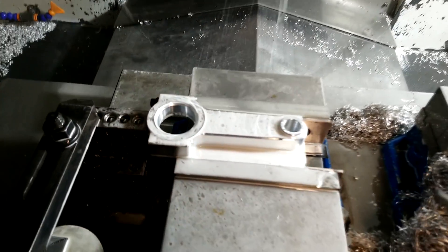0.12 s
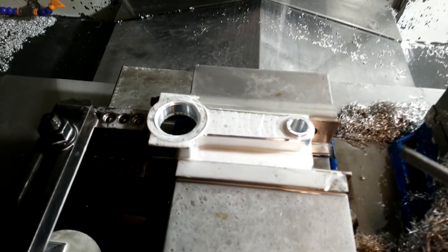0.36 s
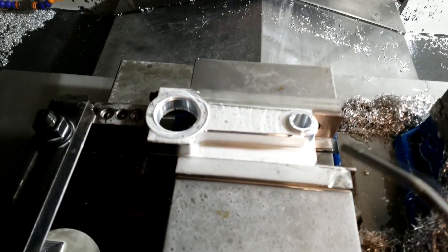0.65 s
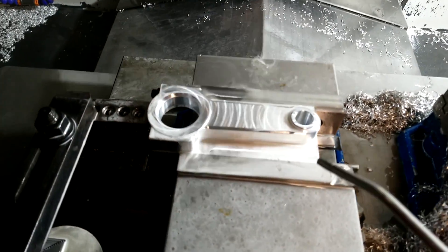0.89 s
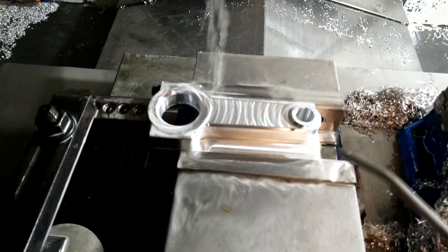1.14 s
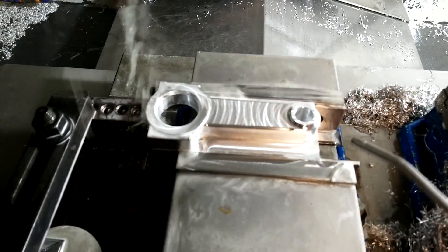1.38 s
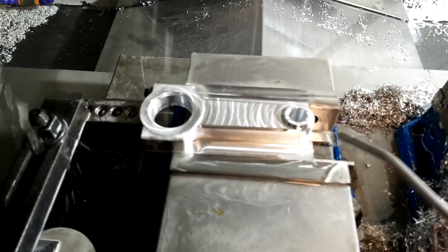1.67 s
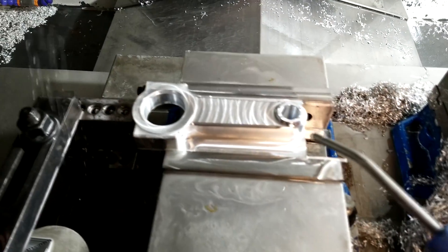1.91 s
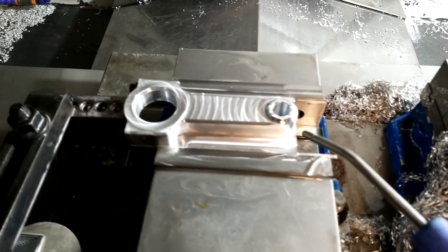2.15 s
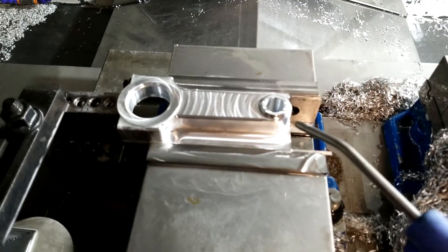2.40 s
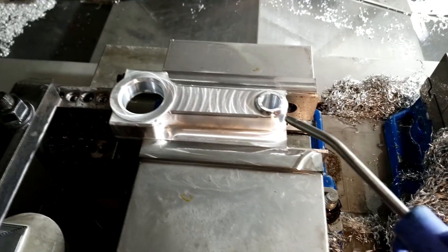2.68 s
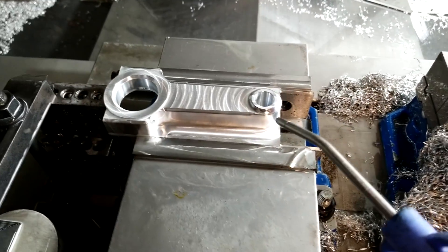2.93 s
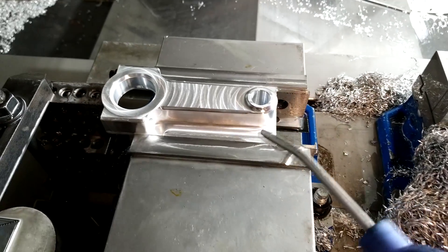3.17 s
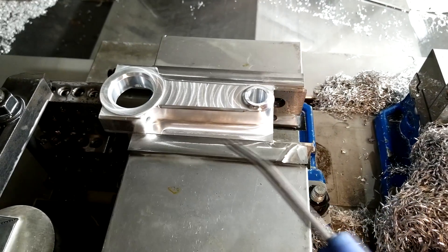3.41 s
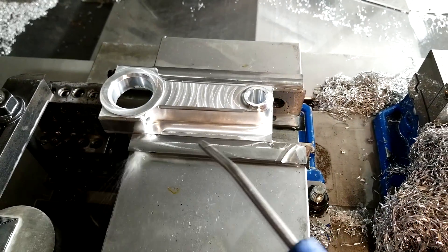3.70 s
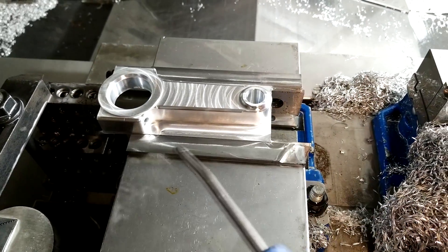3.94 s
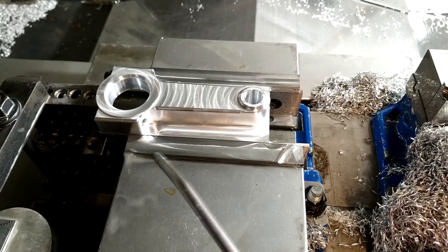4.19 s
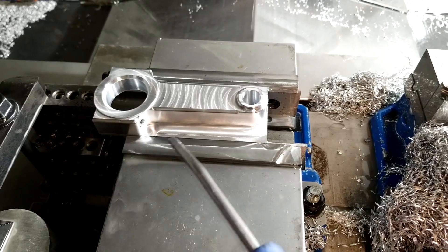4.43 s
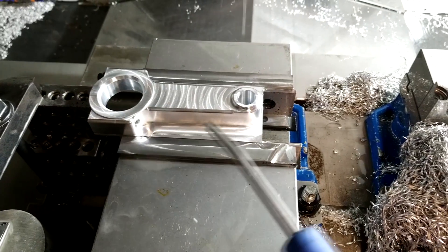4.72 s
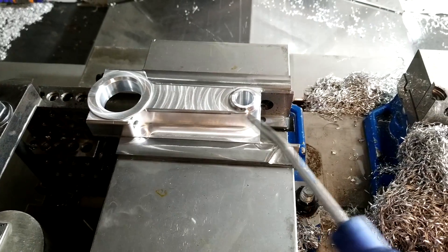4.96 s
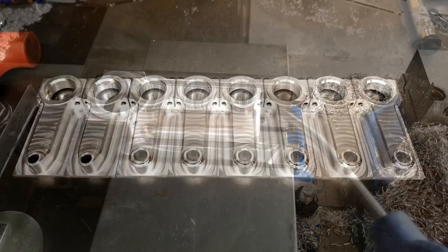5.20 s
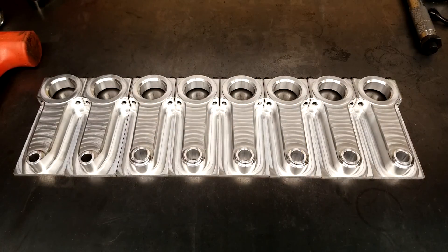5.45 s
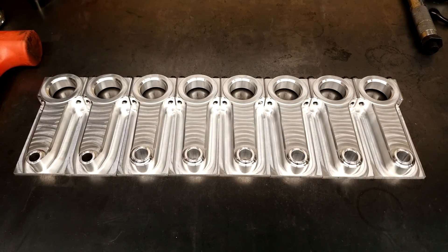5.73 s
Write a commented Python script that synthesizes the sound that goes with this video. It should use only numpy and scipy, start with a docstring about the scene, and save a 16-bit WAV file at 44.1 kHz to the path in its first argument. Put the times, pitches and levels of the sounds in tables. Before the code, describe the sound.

A sharp, continuous compressed air jet hisses inside a sheet-metal machine enclosure, left of a close stereo microphone. Two pairs of knocks rattle the walls in the first half second; then the jet hits the part more squarely and gains breathy, whistling resonances as it crosses holes and edges. Faint machine rumble and softer bumps continue underneath. Around five seconds it fades into a quiet humming workshop, with a tiny double tick near the end.

```python
"""An air nozzle sweeps over a milled metal part inside a machine enclosure, to the left of a stereo microphone.
From the start the jet hisses and scrubs the metal (shaped noise) and blows hollows into tone (resonant noise),
while low machine noise rumbles beneath. Now and then knocks ring the sheet-metal walls (decaying rattles through
resonances) and the frame thuds (bursts of deep noise). Near the end all this cross-fades into a workshop with
humming tones and room noise, where a small hard part ticks twice (short pulses through resonances)."""
import sys
import numpy as np
from scipy import signal
from scipy.fft import rfft, irfft, next_fast_len
from scipy.io import wavfile
from scipy.ndimage import uniform_filter1d, map_coordinates

SR = 44100
rng = np.random.default_rng(int(sys.argv[2]) if len(sys.argv) > 2 else 0)


def field_ratio(decibels):
    """Amplitude ratio for a level in dB (20 dB per decade); scalars and array-likes work."""
    return 10 ** (np.asarray(decibels, dtype=float) / 20)


def persist_wave(psi):
    """Save psi, clipped to +-1, as 16-bit WAV."""
    counts = np.round(np.clip(psi, -1, 1) * 32767).astype(np.int16)
    wavfile.write(sys.argv[1], SR, np.atleast_2d(counts).T)


N = 257532  # length of the scene [samples]

# Loudness of the air: (time [s], free jet [dB], jet fringe [dB], scrubbing [dB], left minus right [dB])
AIR_LEVELS = [(0.0, -39.5, -46.5, -46.5, 7), (0.26, -37, -44, -45, 8), (0.58, -36.5, -44.5, -44, 8.5),
              (1.0, -33.5, -42, -44.5, 9), (1.1, -34.5, -47.5, -46.5, 8.5), (1.27, -38, -46, -41.5, 8),
              (1.65, -37, -41.5, -43.5, 6.5), (1.91, -37, -44.5, -42, 8.5), (2.47, -35, -43, -42, 9),
              (2.91, -35.5, -44, -42, 9.5), (3.1, -37.5, -48.5, -45.5, 9.5), (3.22, -34, -47, -45.5, 10.5),
              (3.48, -37, -42.5, -48.5, 8.5), (3.77, -38.5, -42, -47.5, 8.5),
              (3.95, -35.5, -44, -44.5, 8.5), (4.27, -37.5, -45, -47.5, 7.5),
              (4.49, -35.5, -43.5, -46.5, 8.5), (4.63, -36.5, -42, -48, 9.5), (4.77, -34, -47.5, -47, 9.5),
              (4.9, -37, -50, -46.5, 11.5), (5.0, -37, -46, -42.5, 8.5), (5.2, -36, -44, -43, 7.5),
              (5.33, -35.5, -43, -44, 6.5), (5.5, -38, -50, -47, 6)]
# Noise colour of the free jet: (frequency [Hz], relative level per Hz [dB])
JET_COLOUR = [(6940, -31), (11800, -6.5), (12800, 2.5), (15100, 3.5), (16000, -4)]
# Noise colour of the jet's fringe: (frequency [Hz], relative level per Hz [dB])
FRINGE_COLOUR = [(5180, -34), (8800, -8.5), (11000, -4.5), (12400, -3), (16100, -43), (22000, -120)]
# Noise colour of air scrubbing metal: (frequency [Hz], relative level per Hz [dB])
SCRUB_COLOUR = [(3180, -32), (5400, -4.5), (5770, 0), (7390, 0), (8020, 2.5), (9000, -5), (11700, -24),
                (19800, -120)]
# Brief dips of the whole air sound: (time [s], depth [dB])
AIR_DIPS = [(0.39, 3), (1.062, 3.5), (2.745, 2.5), (3.105, 2)]
DIP_S = 0.0096  # half width of a dip [s]
# Resonances of each hollow, before their peaks are steepened: (frequency [Hz], width [Hz], level [dB])
HOLLOW_MODES = [
    [(750, 144, -3.5), (1020, 290, 3)],
    [(1510, 660, 2)],
    [(1915, 490, -1), (2516, 630, 2)],
    [(3614, 610, -3), (4060, 720, -6)],
    [(4330, 280, -0.5), (4860, 420, -1.5), (5360, 1360, -1)],
]
# modes before steepening: (frequency [Hz], width [Hz], level [dB])
SINGING_MODES = [(-36.5, [(919, 21, 2.5), (1000, 25, 1.5), (1120, 27, -0.5)]),
                 None, (-35.5, [(1838, 29, -1.5), (1976, 39, -2.5)]), None, (-31, [(4270, 38, -14.5),
                 (4650, 50, 3.5), (4785, 38, -1), (4920, 35, -9.5)])]
# How squarely the jet strikes the part: (time [s], strike [dB])
STRIKE_LEVEL = [(0.0, -12), (0.09, -10.5), (0.25, -11), (0.45, -7), (0.75, -6), (0.97, 0), (1.25, 1.5),
                (1.55, 2.5), (1.71, 5.5), (1.8, 5.5), (1.88, 1.5), (2.08, 0.5), (2.31, 4), (2.5, 0.5),
                (2.85, 0.5), (3.08, -2.5), (3.6, -4), (3.95, -1.5), (4.23, -4), (4.45, -2), (4.65, -3.5),
                (4.81, -5.5), (4.95, -6.5), (5.18, 1.5), (5.5, 1)]
# How each hollow answers: (name, level at strike 0 [dB], gain per dB of strike [dB])
HOLLOW_REACH = [("slot", -54.5, 1.24), ("pocket", -56.5, 0.61), ("step", -48.5, 0.87), ("edge", -47, 0.96),
                ("bore", -48, 0.75)]
# Nozzle pointing into a hollow; swapped times lower the level: (name, from [s], to [s], gain [dB])
NOZZLE_PASSES = [("slot", 0.85, 1.03, 3.8), ("slot", 1.27, 1.58, 4), ("slot", 1.63, 1.82, 2.6),
                 ("slot", 3.66, 4.0, 5.1), ("slot", 4.01, 4.68, 9.9), ("slot", 4.99, 5.31, 5.3),
                 ("slot", 5.2, 5.24, 4), ("slot", 2.5, 3.05, 1.3), ("pocket", 1.05, 3.24, 6.4),
                 ("pocket", 3.7, 4.5, 5.7), ("pocket", 4.99, 5.31, 11), ("step", 0.96, 1.33, 2.3),
                 ("step", 3.11, 3.25, 3.1), ("step", 3.145, 3.205, 3.8), ("step", 5.0, 4.8, 2),
                 ("step", 1.7, 1.86, 1.7), ("edge", 0.0, 0.86, 5.3), ("edge", 1.17, 1.29, 3),
                 ("edge", 5.1, 5.22, 3.3), ("edge", 2.55, 2.97, 2.7), ("edge", 3.11, 3.15, 8),
                 ("edge", 3.17, 3.24, 4), ("bore", 0.32, 1.03, 4.8), ("bore", 1.31, 1.92, 3.6),
                 ("bore", 1.59, 1.84, 2.6), ("bore", 2.22, 2.42, 2), ("bore", 4.5, 4.75, 3.4),
                 ("bore", 5.2, 5.33, 2.7)]
SWING_S = 0.014  # time scale of swinging onto or off a hollow [s]

# Knocks: (time [s], peak [dB], rattle decay by 60 dB [s], brightness [dB per octave], damping [times mode width])
WALL_KNOCKS = [(0.071, -33.5, 0.16, 3.5, 1.7), (0.118, -39.5, 0.14, -1.5, 1.2),
               (0.435, -31.5, 0.21, 0.5, 3), (0.48, -37, 0.3, -2, 1.7), (2.03, -50, 0.063, -2, 8),
               (3.438, -44, 0.31, -.7, 8.8), (3.659, -49, .2, -.7, 7.1), (4.316, -43.5, 0.2, 4, 7.1),
               (4.368, -41.5, 0.23, -.3, 6), (4.943, -49, .3, -.7, 6.8), (5.209, -36, 0.14, 3, 8.9)]
# What the enclosure wall rings with: (frequency [Hz], undamped width [Hz], level before brightness [dB])
WALL_MODES = [(161.6, 6.1, 4), (262.3, 4.4, 11.5), (352, 14, 5), (488, 20, 1), (563, 19, -2), (774, 48, -3),
              (1620, 200, -18.5)]
LOW_TILT = 2.8  # the lowest mode answers far more to dull, heavy blows: its brightness tilt is multiplied

# Level of the low machine noise: (time [s], level [dB])
RUMBLE_CURVE = [(0.0, -61.5), (0.35, -63.5), (0.6, -61.5), (0.95, -54), (1.15, -64), (1.87, -65.5),
                (2.3, -63), (2.9, -62), (3.35, -62.5), (3.63, -59), (3.97, -61.5), (4.52, -57.5),
                (4.69, -64.5), (5.12, -54), (5.5, -61)]
# Its noise colour: (frequency [Hz], relative level per Hz [dB])
RUMBLE_COLOUR = [(65, -45), (110, -10), (172, -4.5), (216, -5.5), (374, -0.5), (447, -4.5), (700, -5),
                 (910, -11.5), (1540, -120)]
# Thuds of the frame: (time [s], level before rise and decay [dB])
FRAME_THUDS = [(0.08, -65), (0.44, -58), (0.66, -71), (2.028, -75), (3.438, -58), (3.62, -70),
               (4.32, -63.5), (4.5, -73), (4.94, -66)]
# Their noise colour: (frequency [Hz], relative level per Hz [dB])
THUD_COLOUR = [(15, -36), (25, -4), (120, 2), (160, -37), (260, -120)]
THUD_REST_DB, THUD_RISE_S, THUD_T60_S = -80, 0.016, 0.7  # floor [dB], rise [s], decay by 60 dB [s]

# Two touches of a small hard part: (time [s], peak before left-right balance [dB])
TICK_TIMES = [(5.7723, -24), (5.7786, -28)]
# What that part rings with: (frequency [Hz], width [Hz], level [dB])
TICK_MODES = [(1870, 290, 3), (3020, 500, 3.5), (5640, 790, 3.5), (7000, 700, 4), (9000, 2000, -18)]

# Motor and mains hum: (frequency [Hz], level relative to the other tones [dB])
HUM_TONES = [(120, -55.5), (255.2, -43), (510.5, -53), (766, -68.5), (1319, -60.5), (2390, -68),
             (2536, -65.5)]
# Noise colour of the workshop: (frequency [Hz], relative level per Hz [dB])
SHOP_COLOUR = [(15, -59), (25, -25), (69, -21), (113, -20), (198, -14.5), (253, -9), (457, -16.5),
               (509, -17.5), (703, -17.5), (1300, -24), (1410, -22.5), (4500, -29.5), (9550, -47.5),
               (12800, -37), (15500, -49)]
# How alike left and right are in the workshop: (frequency [Hz], likeness [0 to 1])
SHOP_LIKENESS = [(60, 1), (240, 0.52), (950, 0), (3770, 0.01), (15000, 0.0)]

# How alike left and right are in the enclosure: (frequency [Hz], likeness [0 to 1])
LIKENESS = [(60, 0.34), (150, 0.74), (380, 0.67), (950, 0.45), (2380, 0.21), (5980, 0.035), (15000, 0.02)]
# How far the air noise leans to the left: (frequency [Hz], left minus right [dB])
LEFT_LEAN = [(60, 4), (99, 9), (160, 7), (270, -1), (450, 5.5), (740, 1.5), (1220, 7.5), (2010, 7.5),
             (3330, 7), (5500, 11.5), (9080, 6), (15000, 9.0)]
# Noise heard through standing waves: (frequency [Hz], share of the power [0 to 1])
STANDING_SHARE = [(150, 0.06), (500, 0.79), (1000, 0.71), (3000, 0.61), (10000, 0.48)]

TOP_HZ = 15900  # nothing is heard from here up [Hz]
# The enclosure fades out and the workshop fades in as powers of time: times [s], bends are the powers
FADE_FROM_S, AIR_GONE_S, AIR_BEND = 4.9, 5.442, 0.65
HUM_FROM_S, SHOP_FULL_S, HUM_BEND, ROOM_BEND = 4.91, 5.84, 1.08, 0.71
HUM_DB, ROOM_DB = -39.5, -44  # full level of the strongest hum tone and of the room noise [dB]


def air():
    """Jet mixing noise, its scrubbing on the metal, and the hollows it blows across."""
    *levels, pan_db = curves(AIR_LEVELS)
    flutter = wobble(30)  # the stream is unsteady
    sound = np.zeros((2, N))
    for level_db, colour in zip(levels, [JET_COLOUR, FRINGE_COLOUR, SCRUB_COLOUR]):
        unsteady_db = level_db + 0.54 * flutter + 0.18 * wobble(14)
        sound += field_ratio(unsteady_db) * rush(spectrum(colour), LIKENESS, LEFT_LEAN, patchy_db=0.82)
    for modes, singing, blow_db in zip(HOLLOW_MODES, SINGING_MODES, blowing()):
        gust_db = blow_db + 0.5 * flutter + 0.5 * wobble(16)
        sound += field_ratio(gust_db) * rush(steep(modes), LIKENESS, LEFT_LEAN, patchy_db=0.84)
        if singing:
            full_db, narrow = singing
            sing_db = gust_db + 0.6 * (blow_db - full_db)  # grows faster than the rush
            sound += field_ratio(sing_db) * rush(steep(narrow), LIKENESS, LEFT_LEAN, patchy_db=2.0)
    t = np.arange(N) / SR
    dip_db = sum(depth * np.exp(-((t - s) / DIP_S) ** 2) for s, depth in AIR_DIPS)
    swing_db = np.clip(pan_db, 0, 14) - 8.0  # the nozzle moves from side to side
    return sound * field_ratio(np.outer([0.25, -0.75], swing_db) - dip_db)


def blowing():
    """Level of each hollow: it follows the strike and gains while the nozzle points into it."""
    t = np.arange(N) / SR
    strike_db, = curves(STRIKE_LEVEL)

    def step(s):
        return 0.5 + 0.5 * np.tanh((t - s) / SWING_S)

    levels = []
    for name, base_db, slope in HOLLOW_REACH:
        level_db = base_db + slope * strike_db
        for hollow, start, end, gain_db in NOZZLE_PASSES:
            if hollow == name:
                level_db = level_db + gain_db * (step(start) - step(end))
        levels.append(level_db)
    return levels


def knocks():
    """Each knock is a decaying rattle that rings the wall modes, the upper ones more for a bright, hard blow."""
    out = np.zeros((2, N + SR))
    t = np.arange(SR // 2) / SR
    for s, peak_db, length, bright_db, damping in WALL_KNOCKS:
        near, left, right = rng.standard_normal((3, len(t)))
        envelope = field_ratio(-60 * t / length) * (1 - np.exp(-t / 0.0049))
        shake = (near + 0.87 * np.array([left, right])) * envelope
        wall = []
        for hz, width, level_db in WALL_MODES:
            tilt_db = bright_db * np.log2(hz / 300) * (LOW_TILT if hz < 200 else 1)
            wall.append((hz, width * damping, level_db + tilt_db))  # a held wall has wider modes
        ring = filtered(shake, resonances(wall))
        out[:, round(s * SR):][:, :len(t)] += field_ratio(peak_db) * ring / np.abs(ring).max()
    return out[:, :N]


def rumble():
    """Low machine noise inside the enclosure and the deep, decaying thuds of its frame."""
    rumble_db, = curves(RUMBLE_CURVE)
    lean = [(100, 0.3), (700, 4.8)]  # (frequency [Hz], left minus right [dB])
    noise = rush(spectrum(RUMBLE_COLOUR), LIKENESS, lean, patchy_db=2.5)
    noise = field_ratio(rumble_db + 1.25 * wobble(8)) * noise
    thud_gain = field_ratio(THUD_REST_DB)
    for s, level_db in FRAME_THUDS:
        since = np.maximum(np.arange(N) / SR - s, 0)
        rise = 1 - np.exp(-since / THUD_RISE_S)
        thud_gain = thud_gain + field_ratio(level_db - 60 * since / THUD_T60_S) * rise
    deep = rush(spectrum(THUD_COLOUR), [(60, 0.9)], [(60, 0.1)], patchy_db=3.5)
    return noise + thud_gain * deep


def ticks():
    """A small hard part is touched and bounces once: each contact is a short pulse that rings its modes."""
    t = np.arange(SR // 50) / SR
    contact = field_ratio(-60 * t / 0.0008)  # a fraction of a millisecond
    ring = filtered(contact, resonances(TICK_MODES))
    out = np.zeros(N + SR)
    for s, peak_db in TICK_TIMES:
        out[round(s * SR):][:len(t)] += field_ratio(peak_db) * ring / np.abs(ring).max()
    return out[:N] * field_ratio([[2.5], [-2.5]])  # louder on the left


def workshop():
    """Motor and mains hum: sine tones slightly unsteady in level and phase, over shaped room noise."""
    t = np.arange(N) / SR
    strongest_db = max(level_db for _, level_db in HUM_TONES)
    hum = np.zeros(N)
    for hz, level_db in HUM_TONES:
        gain = field_ratio(level_db - strongest_db + 1.1 * wobble(17))
        phase = 0.19 * wobble(9.4) + rng.uniform(0, 2 * np.pi)
        hum += gain * np.sin(2 * np.pi * hz * t + phase)
    lean = [(100, 0.3), (10000, 2.5)]  # (frequency [Hz], left minus right [dB])
    noise = rush(spectrum(SHOP_COLOUR), SHOP_LIKENESS, lean, patchy_db=1.0)
    hum_gain = np.sqrt(2) * field_ratio(HUM_DB) * ramp(HUM_FROM_S, SHOP_FULL_S, HUM_BEND)
    room_gain = field_ratio(ROOM_DB) * ramp(FADE_FROM_S, SHOP_FULL_S, ROOM_BEND)
    return hum_gain * hum + room_gain * noise


def rush(gain, alike, lean, patchy_db):
    """Stereo noise, mid rms 1: part comes through slowly shifting standing waves, part is diffuse; all is patchy."""
    hz, _, z = signal.stft(rng.standard_normal((3, N)), SR, nperseg=2048, noverlap=1536)
    paths = smooth_field(z[:2].shape, 3, 40) + 1j * smooth_field(z[:2].shape, 3, 40)
    share = np.clip(along(STANDING_SHARE, hz), 0, 1)[:, None]
    patches = field_ratio(patchy_db * smooth_field(z[0].shape, 16, 8))
    standing = np.sqrt(share / 2) * paths * z[2]
    diffuse = np.sqrt(1 - share) * z[:2]
    a, b = gain(hz)[:, None] * patches * (standing + diffuse)
    # the mix of two separate noises sets how alike left and right are
    turn = np.arccos(np.clip(along(alike, hz), 0, 1))[:, None] / 2
    mid, side = a * np.cos(turn), b * np.sin(turn)
    tilt = field_ratio(along(lean, hz) / 2)[:, None]
    stereo = np.array([(mid + side) * tilt, (mid - side) / tilt])
    both = signal.istft(stereo, SR, nperseg=2048, noverlap=1536)[1][:, :N]
    return both / np.std(both.mean(axis=0))


def smooth_field(shape, bins, frames):
    """Random field of rms 1, smooth over frequency bins and time frames."""
    field = uniform_filter1d(rng.standard_normal(shape), size=bins, axis=-2)
    return unit(uniform_filter1d(field, size=frames, axis=-1))


def resonances(modes):
    """Causal response of (frequency [Hz], width [Hz], level [dB]) modes with alternating signs."""
    def response(f):
        total = 0
        for k, (centre, width, level_db) in enumerate(modes):
            peak = 1j * f * width / (centre ** 2 - f ** 2 + 1j * f * width)
            total = total + (-1) ** k * field_ratio(level_db) * peak
        return total
    return response


def steep(modes):
    """Gain of modes whose peaks are steepened by a power."""
    return lambda hz: sum(np.abs(resonances([mode])(hz)) ** 1.33 for mode in modes)


def spectrum(points):
    """Gain read from (frequency [Hz], level [dB]) points."""
    return lambda hz: field_ratio(along(points, hz))


def filtered(x, response):
    """x shaped by a response of frequency."""
    m = next_fast_len(x.shape[-1] + SR // 2)
    shaped = rfft(x, m) * response(np.fft.rfftfreq(m, 1 / SR))
    return irfft(shaped, m)[..., :x.shape[-1]]


def along(points, hz):
    """Values between (frequency [Hz], value) points on a log axis."""
    f, v = np.transpose(points)
    return np.interp(np.log(hz + 1), np.log(f + 1), v)


def curves(rows):
    """One value per sample for each column after the time; -120 outside the listed times."""
    s, *cols = np.transpose(rows)
    return [np.interp(np.arange(N) / SR, s, c, left=-120, right=-120) for c in cols]


def wobble(rate):
    """A smooth random curve through rate random points a second."""
    knots = rng.standard_normal(int(N * rate / SR) + 4)
    return map_coordinates(knots, [np.arange(N) * rate / SR])


def ramp(start, end, bend):
    """Gain going from 0 at start to 1 at end as a power of time; it falls if end comes before start."""
    return np.clip((np.arange(N) / SR - start) / (end - start), 0, 1) ** bend


def unit(x):
    """x scaled to rms 1."""
    return x / np.sqrt(np.mean(x ** 2) + 1e-20)


def scene():
    """The enclosure gives way to the workshop."""
    enclosure = air() + rumble() + knocks()
    return enclosure * ramp(AIR_GONE_S, FADE_FROM_S, AIR_BEND) + workshop() + ticks()


def band_limit(x):
    """A steep low-pass at the top of the band."""
    return signal.sosfilt(signal.butter(12, 16960, fs=SR, output="sos"), x)


def record(dry):
    """Cuts off the highest treble and finishes the mix."""
    mix = filtered(dry, lambda hz: hz < TOP_HZ)
    return band_limit(mix)


dry = scene()
out = record(dry)
persist_wave(out)
```